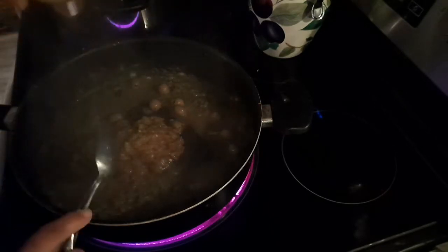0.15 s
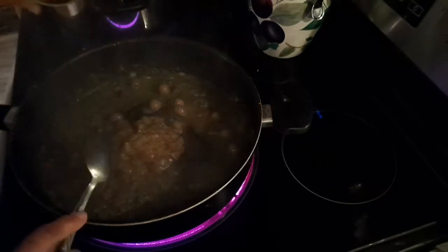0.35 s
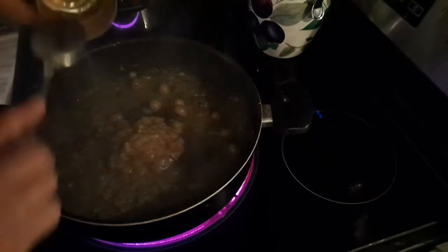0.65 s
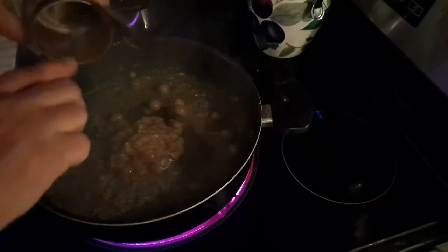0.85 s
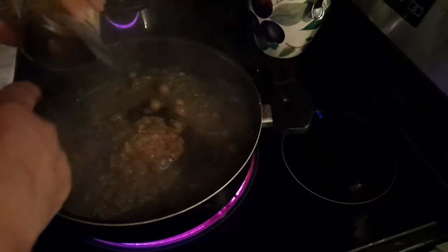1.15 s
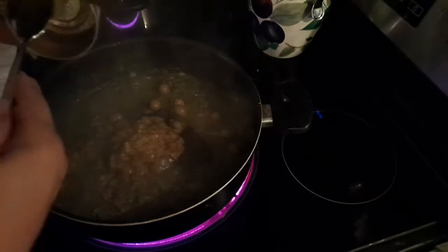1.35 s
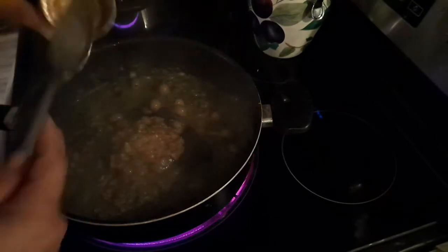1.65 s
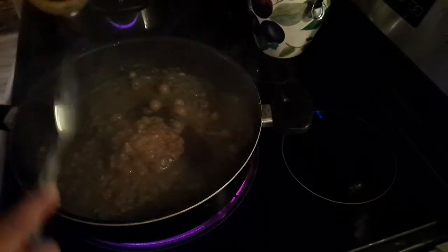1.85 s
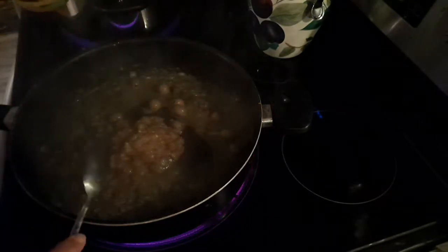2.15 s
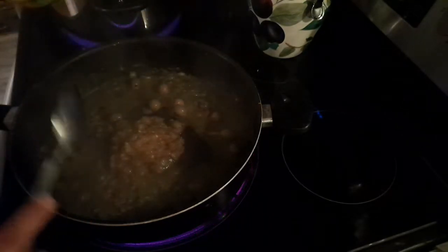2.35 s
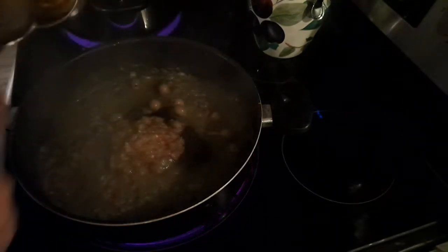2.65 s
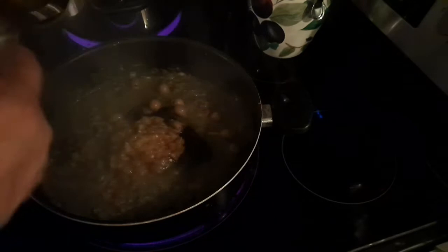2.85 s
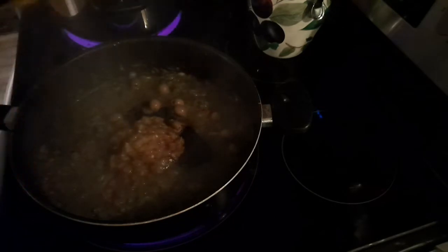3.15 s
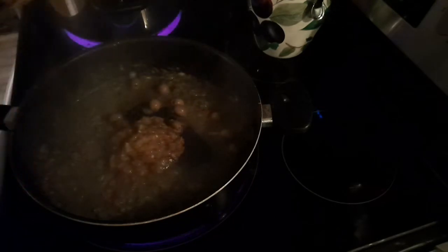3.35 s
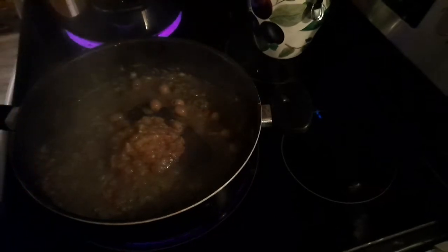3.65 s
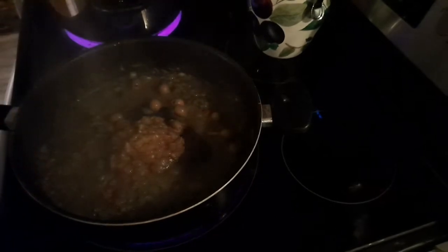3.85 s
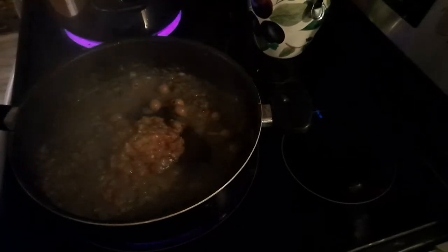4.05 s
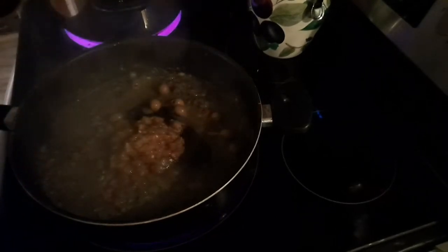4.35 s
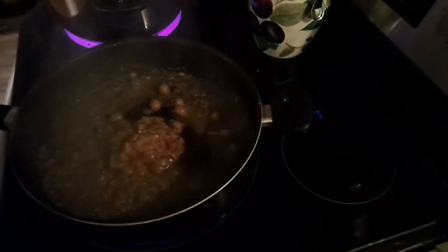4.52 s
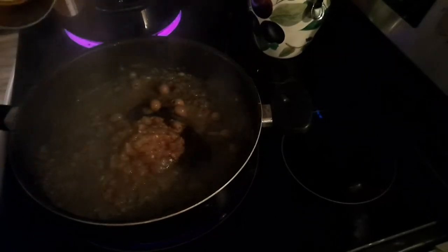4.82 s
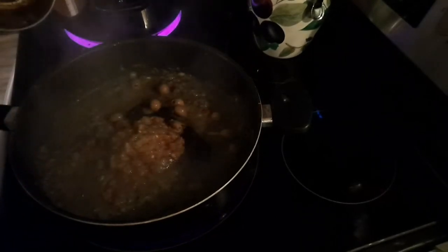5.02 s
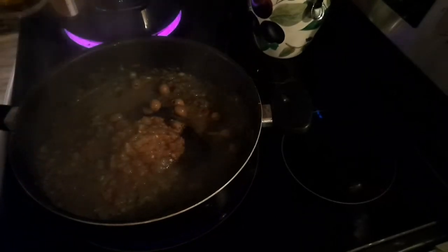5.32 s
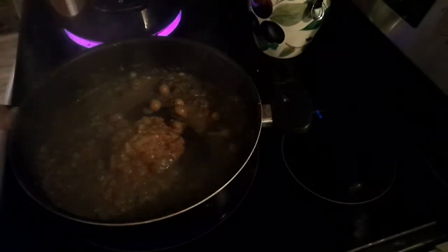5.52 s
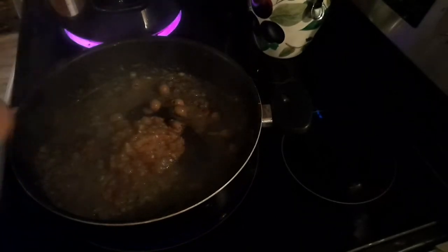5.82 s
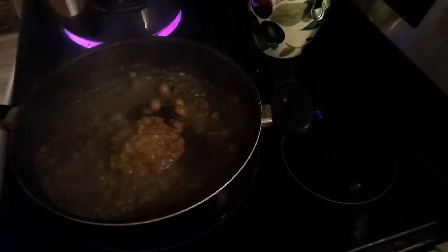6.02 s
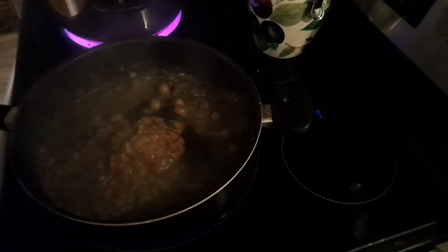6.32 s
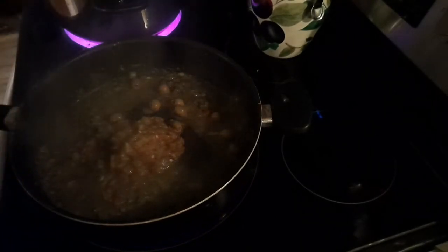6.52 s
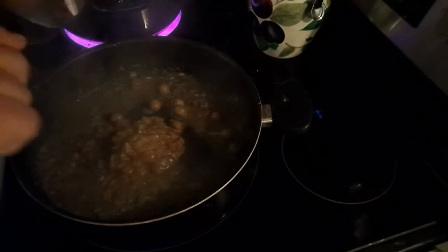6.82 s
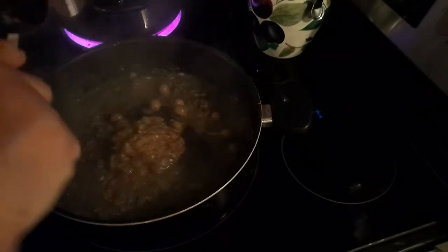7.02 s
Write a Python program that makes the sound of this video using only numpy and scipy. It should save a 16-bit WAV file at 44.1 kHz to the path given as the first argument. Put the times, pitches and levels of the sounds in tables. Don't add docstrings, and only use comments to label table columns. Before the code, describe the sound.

Food simmers softly in a pan with a faint low fan hum. A steel spoon gives two loud, damped knocks on the pan rim, clinks and scrapes briefly in a small tin can, then knocks the pan twice more. A dense, irregular rattle of hollow can taps and short rasps follows, growing sparser near the end. Close stereo pickup, can to the left, short hard kitchen echo.

```python
import sys
import numpy as np
from scipy import signal
from scipy.fft import rfft, irfft, next_fast_len
from scipy.io import wavfile
from scipy.ndimage import uniform_filter1d

SR = 44100
rng = np.random.default_rng(int(sys.argv[2]) if len(sys.argv) > 2 else 0)


def wav_record(signal):
    frames = np.transpose(np.atleast_2d(signal))
    bounded = np.clip(frames, -1, 1)
    quanta = np.round(bounded * 32767).astype(np.int16)
    wavfile.write(sys.argv[1], SR, quanta)


def how_loud(loudness_db):
    steps = np.asarray(loudness_db, float) / 20
    return 10 ** steps


N = 316197

# [t/s, level/dB]
SIMMER = [(0.0, -48), (0.6, -50), (3.0, -49.5), (4.4, -51.5), (5.2, -54), (6.7, -51.5), (7.17, -51)]
# [f/Hz, level per Hz/dB]
SIMMER_COLOUR = [(15, -62), (25, -48), (44, -1), (263, -14.5), (344, 2), (394, -7), (775, -3.5), (962, -5),
                 (1070, -2), (1230, -2), (1480, -0.5), (2050, -1.5), (3160, -5.5), (12500, -3.5),
                 (16000, -5.5)]
# [f/Hz, likeness -1 to 1]
SIMMER_LIKENESS = [(60, 0.9), (130, 0.7), (290, 0.62), (640, 0.31), (1410, 0.07), (3100, -0.05),
                   (6820, -0.07), (15000, -0.03)]
# [f/Hz, width/Hz, level/dB]
FAN = [(59.7, 8.2, -71.5), (127.5, 7.5, -78.5), (336, 39, -93)]
# [f/Hz, time to fall 60 dB/s, level/dB]
ROOM = [(147, 0.83, -31.5), (486, 0.38, -15), (1780, 0.51, -13.5), (4000, 0.27, -14.5), (11700, 0.44, -8)]
# [f/Hz, width/Hz, level/dB]
MIC_DIPS = [(5960, 1800, -1.5), (8200, 3000, -5)]
TOP_HZ, HISS_TOP_HZ = 16150, 15650

# [t/s, level/dB]
BASE_THUDS = [(0.865, -41), (0.894, -35.5), (2.868, -41.5), (3.01, -39.5), (3.237, -48), (3.53, -32.5),
              (3.636, -36), (3.683, -40), (3.917, -37), (4.16, -35), (4.4, -40), (4.63, -39), (4.827, -46),
              (5.775, -41), (6.085, -38.5), (6.39, -36)]
# [t/s, level/dB]
WALL_THUDS = [(3.531, -33.5), (3.918, -37.5), (3.0, -44), (1.012, -42), (4.386, -41), (4.965, -40.5),
              (5.254, -42), (5.685, -40.5), (6.795, -40.5)]
# (t/s, level/dB, f/Hz)
SLOP = (1.518, -40, 600)
JOLT_S = [4.39, 5.745]
JOLT_DB = [-42, -34.5]
BASE_HZ, WALL_HZ, JOLT_HZ = 346.6, 488.4, 47.2

# [t/s, body level/dB, ring level/dB, crack level/dB]
KNOCKS = [
    (0.223, -6, -18.5, -27.5),
    (0.427, -6, -20, -29),
    (2.049, -9, -19.5, -26),
    (2.259, -4.5, -20, -28),
]
# [f/Hz, level/dB, time to fall 60 dB/s]
PAN_BODY = [(93.5, -7.5, 0.48), (143, -7, 0.17), (213, 0, 0.12), (249, -6, 0.35), (341.4, 4, 0.22),
            (379.3, -1.5, 0.3), (451.7, -4, 0.21), (555.4, 14, 0.052), (651, -4, 0.17), (778, -10, 0.14)]
# [f/Hz, level/dB, time to fall 60 dB/s]
PAN_RING = [(1060, 4.2, 0.11), (1200, 13.4, 0.019), (2063, 9.2, 0.081), (2355, 4.6, 0.082),
            (2947, 4.4, 0.096), (5806, 9.2, 0.027)]
# [f/Hz, level/dB]
PAN_COLOUR = [(60, -38), (150, -13), (500, 8.5), (800, -2.5), (1600, -0.5), (3000, -3.5), (4500, -8),
              (6000, -2), (8600, -8), (12000, -34), (16000, -39)]
BOOM_RISE_S = 0.0042

# [f/Hz, level/dB, time to fall 60 dB/s]
SHELL = [(1083, -13.5, 0.77), (1190, -6, 0.063), (1475, -2.5, 0.05), (1830, -7, 0.16), (2010, -6, 0.07),
         (2635, -9, 0.2), (2980, -14.5, 0.16), (3300, -13.5, 0.28), (3487, 1.5, 0.016), (4010, -6, 0.13),
         (4170, 0.5, 0.022), (4630, 7.5, 0.014), (5430, -17, 0.024), (5560, -4, 0.04), (5880, -4, 0.058),
         (6332, -1, 0.054), (7560, -3, .04), (9420, 0, 0.018)]
# [f/Hz, level/dB]
CRACK_COLOUR = [(1200, -4), (2800, -4), (4200, -2.5), (5100, 0.5), (6200, -3), (7400, 7.5), (8600, 4),
                (10000, 4.5), (12500, 5.5), (16000, -1.5)]
# [t/s, level/dB, air ring f/Hz, loudest shell f/Hz, bite of the edge/dB]
STRIKES = [(0.897, -4.5, 1143, 3580, -9.5), (2.793, -19, 1056, 7400, -5), (2.867, -12, 1190, 3500, -7.5),
           (3.013, -9.5, 1091, 4250, -10), (3.531, -7, 1228, 6230, -10), (3.584, -8.5, 1191, 4580, -8),
           (3.636, -15, 1160, 2685, -1.5), (3.842, -6, 1190, 3916, -9), (3.918, -9, 1140, 4010, -6),
           (4.107, -7, 1299, 3535, -10), (4.162, -8, 1190, 6650, -9), (4.334, -11.5, 1360, 4670, -14),
           (4.384, -8.5, 1200, 4460, -7), (4.615, -8, 1204, 2900, -13), (4.622, -10.5, 1290, 2600, -7),
           (4.945, -12, 1209, 7700, -6), (5.254, -13, 1130, 4170, -7.5), (5.686, -21.5, 1130, 4380, 3),
           (5.743, -17, 1160, 4100, 2), (5.777, -18.5, 1090, 3600, 3.5), (6.07, -22, 1161, 7520, 1.5),
           (6.388, -11.5, 1170, 7800, -3), (6.462, -7.5, 1201, 2670, -12), (6.795, -16, 1164, 1990, -7)]
# [t/s, level/dB, air ring f/Hz, loudest shell f/Hz]
REBOUNDS = [(1.565, -32.5, 1140, 3440), (2.868, -13, 1336, 2586), (3.538, -24, 1190, 1930),
            (3.927, -19, 1158, 1794), (3.684, -24, 1200, 4010), (3.851, -24, 1204, 4010),
            (4.176, -12, 1161, 3996), (4.397, -10.5, 1190, 3970), (4.406, -17, 1212, 3970),
            (5.009, -28.5, 1115, 2700), (6.538, -32, 1204, 4000)]
# [t/s, level/dB, air ring f/Hz, bite/dB]
BUMPS = [(0.869, -21.5, 1076, -10), (1.014, -17.5, 1108, -15), (1.163, -25, 1130, -21),
         (1.287, -20, 1082, -34), (1.309, -19.5, 1093, -31), (2.861, -22, 1430, -3),
         (2.95, -29.5, 1200, -7), (2.998, -27, 1030, -12), (3.079, -31, 1045, -27),
         (3.239, -32.5, 1120, -11), (4.279, -31, 1165, -21), (4.502, -29.5, 1144, -24),
         (4.667, -19, 1066, -16), (4.87, -37, 1130, -3), (4.952, -14, 1156, -10), (5.247, -14, 1332, -5),
         (5.73, -34, 1107, 2), (6.289, -31, 1165, -15), (6.392, -9, 1134, -22), (6.809, -29, 1260, -15),
         (6.885, -27, 1200, -17), (4.827, -25.5, 1093, -1), (6.669, -26, 1205, -7)]
# [t/s, level/dB, loudest shell f/Hz]
TICKS = [(0.963, -35, 3770), (1.164, -36, 4430), (1.605, -28.5, 7500), (2.826, -42, 3120),
         (2.847, -31.5, 3660), (3.469, -27.5, 7450), (3.505, -37, 5260), (3.63, -27, 7500),
         (3.932, -22.5, 3540), (4.969, -32, 4180), (5.145, -17, 4400), (6.031, -24, 4200),
         (6.086, -23, 2630), (6.375, -32, 6900), (6.449, -34, 4100), (6.719, -34, 4360)]
# [t/s, length/s, pressure level/dB]
SLIDES = [(0.941, 0.043, -27), (1.249, 0.16, -35), (1.469, 0.14, -43), (1.585, 0.052, -37),
          (2.987, 0.015, -23), (4.379, 0.021, -28), (4.618, 0.06, -31), (6.072, 0.052, -27.5),
          (7.09, 0.052, -43.5), (5.79, .12, -36)]
# [t/s, length/s, pressure level/dB, loudest shell f/Hz, grit/dB]
DRAGS = [(0.931, 0.09, -39, 4430, 0), (0.946, 0.053, -44, 3650, -7), (1.53, 0.13, -51.5, 2420, 12),
         (2.82, 0.025, -47, 3300, 4), (2.983, 0.033, -35.5, 4080, 6), (3.584, 0.088, -43, 7200, 12.5),
         (3.582, 0.029, -47, 4620, -18), (3.858, 0.069, -39.5, 4670, 0), (3.89, 0.036, -44, 4000, 8),
         (3.915, 0.035, -56, 4000, 3), (4.161, 0.044, -27.5, 4010, -3), (4.35, 0.037, -41.5, 5100, -5),
         (4.388, 0.019, -22, 5870, -6), (4.62, 0.044, -36.5, 4000, 6.5), (4.948, 0.048, -38.5, 4090, -13),
         (5.247, 0.027, -32.5, 4010, 8), (5.687, 0.022, -54, 4150, 4), (5.741, 0.048, -36, 4010, 1),
         (6.068, 0.11, -37, 3155, 3)]
# [t/s, length/s, level/dB, start f/Hz, end f/Hz]
RASPS = [(.945, 0.047, -42, 4550, 4350), (0.953, 0.036, -49, 3700, 3650), (0.948, .04, -41, 7000, 6900),
         (1.557, .035, -56, 3600, 3400), (1.586, .04, -54, 5400, 5700), (1.603, 0.027, -46, 7500, 7500),
         (2.81, 0.056, -46.5, 3100, 3400), (3.587, 0.046, -36, 4700, 4600), (3.605, 0.037, -30, 9560, 9500),
         (3.604, 0.038, -34.5, 7200, 7200), (3.864, 0.048, -42, 4800, 4400), (3.893, 0.03, -39, 6960, 6900),
         (3.897, 0.019, -36, 9400, 9500), (6.028, 0.034, -51, 3720, 3500), (6.074, 0.077, -47, 3700, 3380),
         (6.079, 0.053, -51, 2630, 2600), (4.341, 0.042, -38, 4930, 5050), (2.989, 0.024, -41, 4200, 4150),
         (2.99, .022, -42, 9200, 9500), (1.59, .04, -50, 2600, 2500)]
# [t/s, level/dB, f/Hz, time to fall 60 dB/s]
NOTES_EARLY = [(0.868, -49, 1730, 0.15), (0.868, -51, 3510, 0.127), (0.868, -45, 3040, 0.129),
               (0.897, -19, 7050, 0.047), (0.897, -28, 5900, 0.076), (0.897, -29, 6250, 0.13),
               (1.015, -49, 4100, 0.088), (1.015, -54, 3130, 0.109), (1.163, -50, 3520, 0.074),
               (2.793, -45, 8460, 0.039), (2.793, -43, 6630, 0.07), (2.793, -46, 3530, 0.131),
               (2.867, -15, 3560, 0.046), (2.867, -28, 4220, 0.052), (3.014, -24, 5940, 0.09),
               (3.013, -28, 4060, 0.084), (3.469, -43, 7640, 0.037), (3.469, -46, 3250, 0.119),
               (3.469, -47, 3500, 0.05), (3.531, -14.5, 6130, 0.082), (3.637, -30, 2840, 0.043),
               (3.636, -28, 3490, 0.066), (3.636, -33, 10100, 0.04), (3.684, -38, 4080, 0.07),
               (3.841, -18, 4150, 0.054), (3.842, -22, 4560, 0.08), (3.842, -22, 2900, 0.046),
               (3.918, -26, 1810, 0.15), (4.107, -21.5, 3450, 0.066), (4.162, -30, 3980, 0.15),
               (4.162, -37, 3320, 0.13), (4.334, -24, 2130, 0.064), (4.334, -36, 4770, 0.054),
               (4.334, -36, 10290, 0.049), (4.397, -14, 3960, 0.061), (4.397, -22, 6040, 0.042),
               (4.615, -29, 6700, 0.064), (4.615, -33, 4700, 0.15), (4.615, -36, 9500, 0.15)]
# [t/s, level/dB, f/Hz, time to fall 60 dB/s]
NOTES_LATE = [(4.667, -37, 3080, 0.077), (4.667, -42, 4080, 0.07), (4.827, -33, 3790, 0.051),
              (4.827, -39, 3180, 0.046), (4.827, -49, 7450, 0.063), (4.945, -34, 6510, 0.076),
              (4.945, -28, 9200, 0.058), (4.945, -27, 10010, 0.051), (5.145, -38, 10700, 0.05),
              (5.145, -44, 7460, 0.057), (5.145, -38, 3670, 0.081), (5.25, -32, 4130, 0.16),
              (5.686, -36, 5360, 0.045), (5.686, -36, 3320, 0.053), (5.686, -42, 10090, 0.062),
              (5.743, -24, 10700, 0.05), (5.743, -36, 5500, 0.099), (5.777, -28, 3580, 0.05),
              (5.777, -32, 10310, 0.044), (6.031, -45, 7450, 0.056), (6.031, -41, 4160, 0.053),
              (6.031, -50, 2770, 0.047), (6.071, -38, 10200, 0.15), (6.071, -42, 3100, 0.15),
              (6.071, -44, 6140, 0.15), (6.087, -31, 2590, 0.127), (6.087, -38, 3510, 0.2),
              (6.388, -27, 5600, 0.061), (6.388, -32, 4290, 0.17), (6.388, -33, 10500, 0.04),
              (6.462, -35, 3860, 0.059), (6.462, -38, 3230, 0.16), (6.462, -39, 5680, 0.069),
              (6.669, -37, 3230, 0.077), (6.719, -54, 3220, 0.073), (6.719, -54, 3520, 0.17),
              (6.719, -55, 3790, 0.051), (6.795, -37, 1950, 0.11), (6.795, -39, 9580, 0.059),
              (6.795, -42, 5780, 0.044)]
# [t/s, level/dB, f/Hz, time to fall 60 dB/s]
NOTES_OTHER = [(.224, -23, 640, .1), (.428, -23, 590, .1), (.224, -27, 2050, .12), (.428, -36, 3500, .08),
               (2.05, -22, 2900, 0.07), (2.26, -25, 2900, .08), (2.05, -29, 2050, .07),
               (4.965, -36, 4900, .2), (5.78, -36, 1810, .2), (5.25, -33, 1860, .2), (4.4, -28, 1850, .15),
               (4.17, -31, 1800, .2), (5.3, -38, 1130, .5), (3.533, -25, 4050, .1), (3.533, -28, 3370, .1),
               (3.533, -24, 6600, .05), (6.39, -30, 3600, .1), (1.595, -44, 1730, .1), (.9, -31, 3580, .12),
               (.9, -32, 2020, .2), (.428, -28, 2050, .12), (1.163, -34, 4520, .05),
               (2.875, -25, 2660, .07), (2.93, -42, 2660, .15), (3.016, -30, 4200, 0.13),
               (3.584, -24, 4600, .14), (3.538, -27, 1880, .12), (3.637, -23, 1480, .06),
               (3.843, -20, 1400, .05), (6.39, -26, 2700, .2), (6.8, -35, 3450, 0.14),
               (4.63, -30, 2020, .08), (4.2, -36, 1420, .3), (3.87, -32, 1400, .1), (6.47, -31, 1450, .15)]

STRIKE_SHELL_DB, STRIKE_SHELL_PER_BITE = -6, 0.38
REBOUND_SHELL_DB, REBOUND_CRACK_DB = -1, -11.5
BUMP_SHELL_DB, BUMP_SHELL_PER_BITE, BUMP_SHELL_HZ = -6.5, 0.42, 2592
TICK_AIR_DB, TICK_SHELL_DB, CAN_AIR_HZ = -7, -5, 1130
DRAG_AIR_DB, DRAG_AIR_HZ = -15, 1125
DRAG_FAVOUR_DB = 12
AIR_WAVER, SHELL_WAVER, THUD_WAVER = 0.18, 0.5, 0.35
AIR_HOLD_S, AIR_LEFT_DB = 0.019, -17
SHELL_HOLD_S, SHELL_LEFT_DB = 0.025, -9
CRACK_PATCHY_DB, SHELL_SCATTER_DB, AIR_SCATTER_DB, SLIP_MAX = 4, 2.5, 2, 2.2
NOTE_PAIR, NOTE_PAIR_DB, NOTE_RISE_S = 1.013, -11, 0.001
RASP_WIDTH_HZ = 200
SIXTY = np.log(1000)


def unit(x):
    return x / np.sqrt(np.mean(x ** 2))


def band(x, lo_hz, hi_hz):
    sos = signal.butter(2, [lo_hz, min(hi_hz, 0.45 * SR)], "band", fs=SR, output="sos")
    return signal.sosfilt(sos, x)


def add(out, s, sound):
    i = int(s * SR)
    out[i:i + len(sound)] += sound[:len(out) - i]


def curve(table, hz, left=None):
    table_hz, value = np.transpose(table)
    return np.interp(np.log(hz), np.log(table_hz), value, left=left)


def dying(t, t60):
    return np.exp(-SIXTY * t / t60)


def walk(rate):
    k = int(SR / rate)
    steps = np.repeat(rng.standard_normal(N // k + 1), k)
    return unit(uniform_filter1d(steps, k)[:N])


def simmer():
    hz = np.maximum(np.fft.rfftfreq(N, 1 / SR), 1)
    pop_db = np.minimum(3 * rng.exponential(size=(2, N)), 9)
    pops = (rng.random((2, N)) < 300 / SR) * how_loud(pop_db)
    pops = pops * rng.choice([-1, 1], (2, N))
    steam = rng.standard_normal((2, N))
    mid, side = rfft(steam + 3.0 * pops) * how_loud(curve(SIMMER_COLOUR, hz)) * (hz < HISS_TOP_HZ)
    like = np.clip(curve(SIMMER_LIKENESS, hz), -0.99, 0.99)
    mid, side = mid * np.sqrt(1 + like), side * np.sqrt(1 - like)
    flicker_db = 0.6 * walk(7)
    level_db = np.interp(np.arange(N) / SR, *np.transpose(SIMMER)) + 4 + flicker_db
    out = unit(irfft(np.array([mid + side, mid - side]), N)) * how_loud(level_db + np.array([[1.2], [-1.2]]))
    for f, width, db in FAN:
        out = out + how_loud(db) * unit(band(rng.standard_normal(N), f - width / 2, f + width / 2))
    return out


def kitchen(x):
    t = np.arange(SR // 2) / SR
    onset = np.clip(t / 0.0032 - 0.4, 0, 1)
    tail = 0
    for hz, t60, db in ROOM:
        same, *own = rng.standard_normal((3, len(t)))
        share = np.clip(250 / hz, 0, 1)
        echo = band(share * same + (1 - share) * np.array(own), hz / 2.15, hz * 2.25) * dying(t, t60)
        energy = t60 * SR / SIXTY / 2 * min(hz / SR * 6.95, 1)
        tail = tail + how_loud(db) * echo * onset / np.sqrt(energy)
    return signal.fftconvolve(x[None], tail, axes=1)[:, :N]


def ports(x, lag_s, pan_db, scatter_db):
    size = next_fast_len(N + 64)
    delay = np.exp(-2j * np.pi * np.fft.rfftfreq(size, 1 / SR) * lag_s)
    late = irfft(rfft(x, size) * delay, size)[:N]
    hits = rng.standard_normal((2, 301)) * (rng.random((2, 301)) < 0.1)
    bounces = np.diff(hits) * np.exp(-np.arange(300) / 90) / 4
    near = how_loud(scatter_db) * signal.fftconvolve(x[None], bounces, axes=1)[:, :N]
    return (np.array([x, late]) + near) * how_loud(np.array([[pan_db], [-pan_db]]) / 2)


def ring(modes, scatter_db, rough=0., rise_s=0.000045, length_s=.19):
    hz, db, t60 = np.transpose(modes)[:, :, None]
    chance = rng.standard_normal((3, len(modes), 1))
    n = int(length_s * SR) // 64 * 64
    t = np.arange(n) / SR
    steps = np.repeat(rng.standard_normal((len(modes), n // 64)), 64, axis=1)
    waver = rough * np.cumsum(steps, axis=1) / 64
    phase = 2 * np.pi * hz * (1 + 0.0063 * chance[0]) * t + waver + np.pi * chance[1]
    waves = np.sin(np.float32(phase)) * np.exp(np.float32(-SIXTY * t / t60))
    x = np.sum(how_loud(db + scatter_db * chance[2]) * waves, axis=0) * (1 - np.exp(-t / rise_s))
    return x / np.sqrt(2 * np.mean(x[:400] ** 2))


def burst(colour, t60, patchy_db, count=8192):
    hz = np.fft.rfftfreq(count, 1 / SR) + 1
    patches = np.interp(hz, np.linspace(0, SR / 2, 70), rng.standard_normal(70))
    db = curve(colour, hz, left=-60) + patchy_db * patches
    noise = unit(irfft(rfft(rng.standard_normal(count)) * how_loud(db), count))
    return noise * dying(np.arange(count) / SR, t60)


def chatter(t60, first, count=1500):
    bounces = rng.standard_normal(count) * (rng.random(count) < 0.03)
    force = bounces * dying(np.arange(count) / SR, t60)
    force[0] = first
    return force / np.sqrt(np.sum(force ** 2))


def stick_slip(length_s):
    n = int(length_s * SR)
    jerks = rng.standard_normal(n)
    size_db = 3.0 * np.minimum(rng.exponential(size=n), SLIP_MAX)
    return unit(np.hanning(n) * jerks * how_loud(size_db))


def choke(x, hold_s, left_db):
    free = np.exp(-(np.arange(len(x)) / SR / hold_s) ** 3)
    return x * (free + how_loud(left_db) * (1 - free))


def thuds():
    out = np.zeros(N)
    bumps = [(s, db, BASE_HZ) for s, db in BASE_THUDS] + [(s, db, WALL_HZ) for s, db in WALL_THUDS]
    bumps += [SLOP] + [(s, db, JOLT_HZ) for s, db in zip(JOLT_S, JOLT_DB)]
    for s, db, hz in bumps:
        modes = [(hz, 0, 0.05), (hz * 1.6, -5, 0.04)]
        add(out, s, how_loud(db + 0.5) * ring(modes, 0, rough=THUD_WAVER, rise_s=0.0015))
    return band(out, 17, 1900)


def pan():
    out, *aside = np.zeros((3, N))
    for s, body_db, ring_db, crack_db in KNOCKS:
        force = chatter(0.032, first=51.0)
        body = ring(PAN_BODY[2:], 0.29, rough=0.26, rise_s=0.00037, length_s=0.5)
        boom = ring(PAN_BODY[:3], 0.3, rough=0.27, rise_s=BOOM_RISE_S, length_s=0.5)
        wall = ring(PAN_RING, 1.0, rough=0.73)
        add(out, s, how_loud(body_db - 9.0) * signal.fftconvolve(force, body))
        add(out, s, how_loud(body_db - 20.5) * boom)
        add(out, s, how_loud(ring_db + 3.5) * signal.fftconvolve(force, wall))
        add(out, s, how_loud(ring_db + 4) * burst(PAN_COLOUR, 0.07, patchy_db=-2.5))
        add(out, s, how_loud(ring_db - 17) * burst(PAN_COLOUR, 0.68, patchy_db=-1.0, count=16384))
        add(out, s, how_loud(crack_db + 14.0) * burst(CRACK_COLOUR, 0.055, patchy_db=5.5))
        for port in aside:
            add(port, s, how_loud(ring_db + 2.0) * burst(PAN_COLOUR, 0.13, patchy_db=1.0))
    return band(band(out, 71, 14400), 48, 26000), np.array(aside)


def notes():
    out, t = np.zeros(N), np.arange(SR // 6) / SR
    for s, db, hz, t60 in NOTES_EARLY + NOTES_LATE + NOTES_OTHER:
        turn = 2 * np.pi * hz * t
        neighbours = np.cos(turn * NOTE_PAIR) + np.sin(turn / NOTE_PAIR ** np.sqrt(3))
        group = np.sin(turn) + how_loud(NOTE_PAIR_DB) * neighbours
        shape = dying(t, t60) * (1 - np.exp(-t / NOTE_RISE_S))
        add(out, s, how_loud(db) * choke(group * shape, 0.029, -8))
    return out


def rasps():
    out, pole = np.zeros(N), np.exp(-np.pi * RASP_WIDTH_HZ / SR)
    for s, length, db, from_hz, to_hz in RASPS:
        slips = np.pad(stick_slip(length), (0, 400))
        turn = np.exp(2j * np.pi * np.cumsum(np.linspace(from_hz, to_hz, len(slips))) / SR)
        glide = np.real(turn * signal.lfilter([1], [1, -pole], slips / turn))
        add(out, s, how_loud(db) * unit(glide))
    return np.array([how_loud(3.0) * out, how_loud(-3.0) * np.roll(out, 13)])


def air(hz):
    group = [(hz, 0, 0.1), (hz * 1.1, -4, 0.05), (hz * 1.22, -7, 0.045), (hz * 0.8, -16, 0.035),
             (CAN_AIR_HZ, -10, 0.28)]
    sound = ring(group, scatter_db=AIR_SCATTER_DB, rough=AIR_WAVER, rise_s=0.0005, length_s=0.22)
    return choke(sound, AIR_HOLD_S, AIR_LEFT_DB)


def taps():
    rows = []
    for s, db, air_hz, hz, bite in STRIKES:
        rows.append((s, db, air_hz, db + STRIKE_SHELL_DB + STRIKE_SHELL_PER_BITE * bite, hz, db + bite))
    for s, db, air_hz, hz in REBOUNDS:
        rows.append((s, db, air_hz, db + REBOUND_SHELL_DB, hz, db + REBOUND_CRACK_DB))
    for s, db, air_hz, bite in BUMPS:
        shell_db = db + BUMP_SHELL_DB + BUMP_SHELL_PER_BITE * bite
        rows.append((s, db, air_hz, shell_db, BUMP_SHELL_HZ, db + bite))
    for s, db, hz in TICKS:
        rows.append((s, db + TICK_AIR_DB, CAN_AIR_HZ, db + TICK_SHELL_DB, hz, db))
    return rows


def tap_can(hollow, metal, aside):
    for s, air_db, air_hz, shell_db, shell_hz, crack_db in taps():
        force = chatter(0.061, first=1.98)
        shell = ring(SHELL + [(shell_hz, 6, 0.05)], SHELL_SCATTER_DB, rough=SHELL_WAVER)
        shell = choke(shell, SHELL_HOLD_S, SHELL_LEFT_DB)
        crack = burst(CRACK_COLOUR, 0.024, patchy_db=CRACK_PATCHY_DB, count=4096)
        add(hollow, s, how_loud(air_db - 3.0) * air(air_hz))
        add(metal, s, how_loud(shell_db - 3.5) * signal.fftconvolve(force, shell))
        add(metal, s, how_loud(crack_db + 2.0) * signal.fftconvolve(force, crack))
        for port in aside:
            add(port, s, how_loud(crack_db + 2.0) * burst(CRACK_COLOUR, 0.018, CRACK_PATCHY_DB, count=2048))


def scrape_can(hollow, metal, aside):
    for s, length, air_db in SLIDES:
        add(hollow, s, how_loud(air_db - 29.5) * signal.fftconvolve(stick_slip(length), air(DRAG_AIR_HZ)))
    for s, length, shell_db, shell_hz, grit_db in DRAGS:
        slips = stick_slip(length)
        air_db, hiss_db = shell_db + DRAG_AIR_DB, shell_db + grit_db
        shell = ring(SHELL + [(shell_hz, DRAG_FAVOUR_DB, 0.05)], 0.7, rough=0.21)
        hiss = burst(CRACK_COLOUR, 0.0045, patchy_db=-6.5, count=2048)
        add(hollow, s, how_loud(air_db - 24.0) * signal.fftconvolve(slips, air(DRAG_AIR_HZ)))
        add(metal, s, how_loud(shell_db - 28.5) * signal.fftconvolve(slips, shell))
        add(metal, s, how_loud(hiss_db - 16.0) * signal.fftconvolve(slips, hiss))
        for port in aside:
            own_hiss = burst(CRACK_COLOUR, 0.013, patchy_db=1.0, count=2048)
            add(port, s, how_loud(hiss_db - 23.0) * signal.fftconvolve(slips, own_hiss))


def can():
    hollow, metal, *aside = np.zeros((4, N))
    tap_can(hollow, metal, aside)
    scrape_can(hollow, metal, aside)
    return band(hollow, 780, 1800), band(metal, 140, 11800), np.array(aside)


def scene():
    hollow, metal, aside = can()
    metal = metal + notes()
    knocks, clatter = pan()
    knocks = knocks + thuds()
    direct = ports(hollow, lag_s=0.00027, pan_db=6.0, scatter_db=-10)
    direct += ports(metal, lag_s=0.000304, pan_db=7.0, scatter_db=0)
    direct += ports(knocks, lag_s=0.0002, pan_db=2.8, scatter_db=-2)
    direct += (aside + clatter) * np.array([[1.5], [1.0]])
    echo = kitchen(how_loud(-7) * hollow + how_loud(-1) * metal + knocks)
    return direct + echo + simmer() + rasps()


def roll_off(x):
    return signal.sosfilt(signal.butter(12, 16620, fs=SR, output="sos"), x)


def record(dry):
    for hz, width, db in MIC_DIPS:
        peak = signal.lfilter(*signal.iirpeak(hz, hz / width, fs=SR), dry)
        dry = dry + (how_loud(db) - 1) * peak
    soft = dry / (1 + np.abs(dry) ** 6) ** (1 / 6)
    top_cut = signal.ellip(12, 0.2, 90, TOP_HZ, fs=SR, output="sos")
    mix = signal.sosfilt(top_cut, soft)
    return roll_off(mix)


dry = scene()
out = record(dry)
wav_record(out)
```